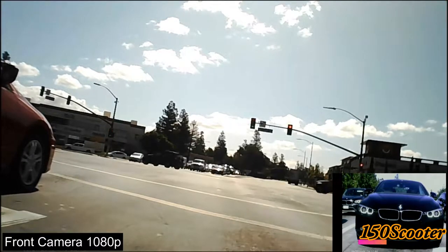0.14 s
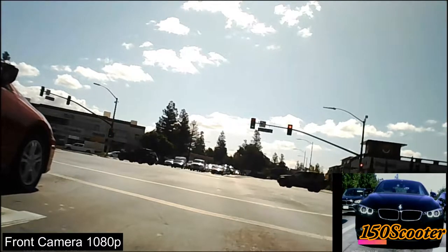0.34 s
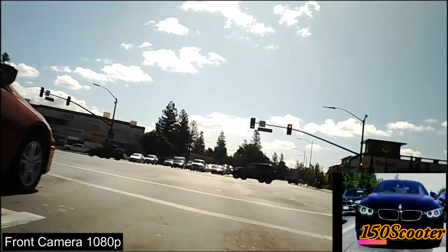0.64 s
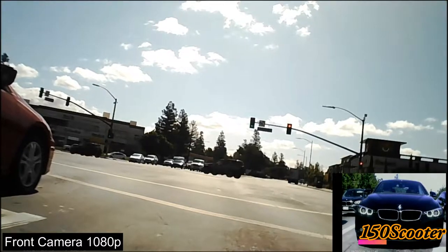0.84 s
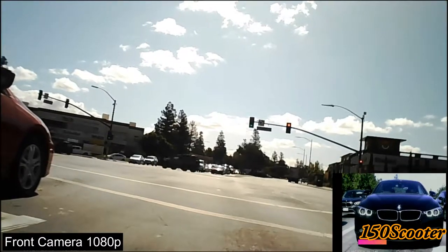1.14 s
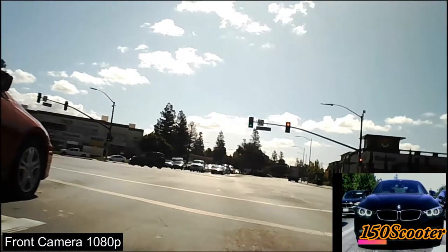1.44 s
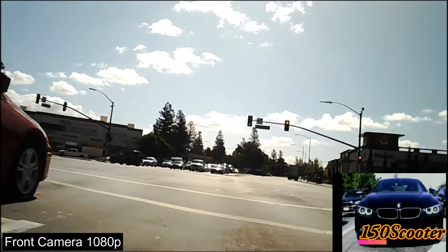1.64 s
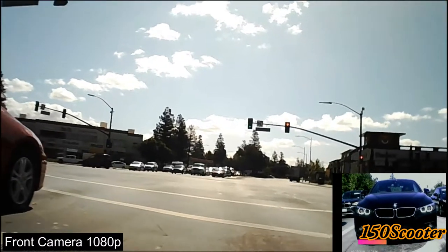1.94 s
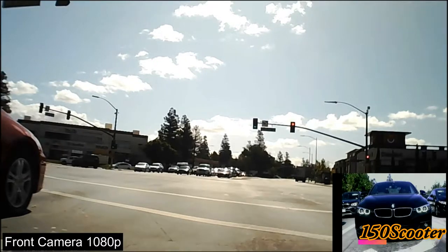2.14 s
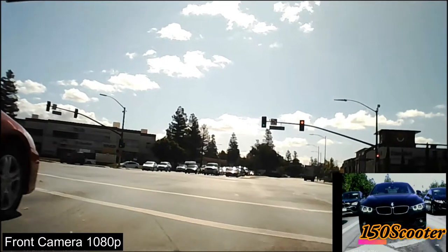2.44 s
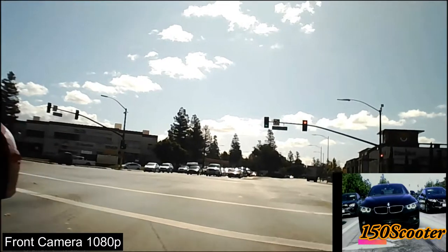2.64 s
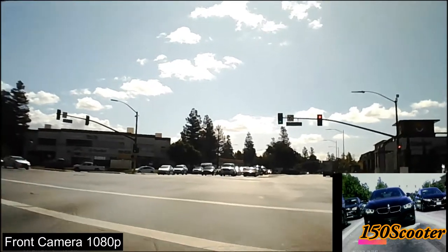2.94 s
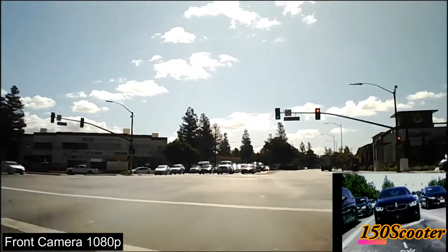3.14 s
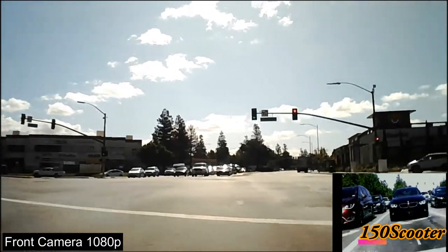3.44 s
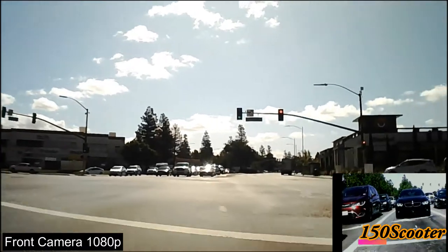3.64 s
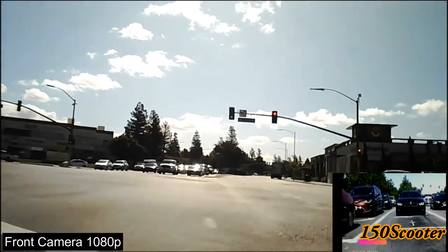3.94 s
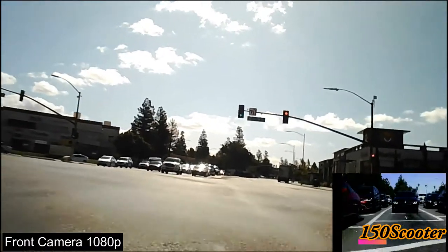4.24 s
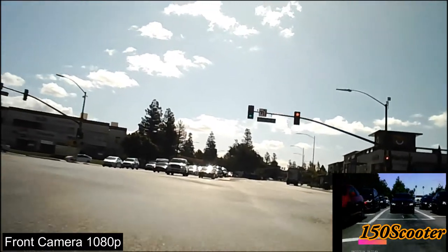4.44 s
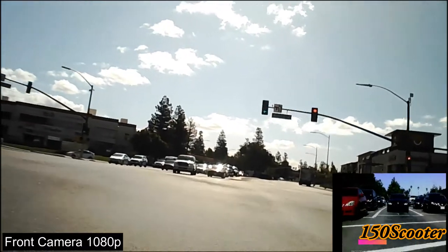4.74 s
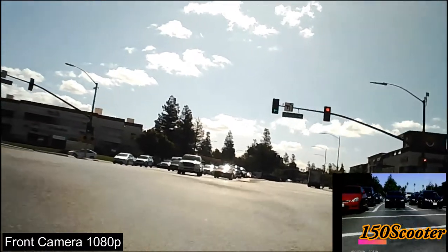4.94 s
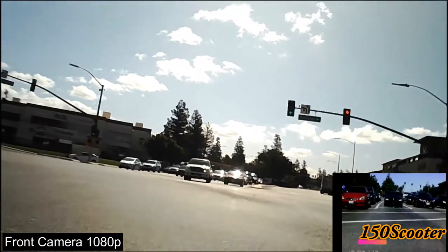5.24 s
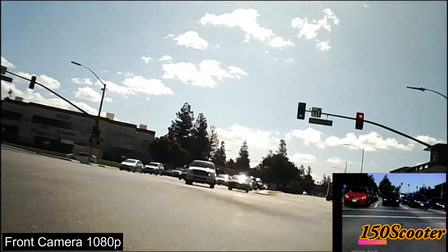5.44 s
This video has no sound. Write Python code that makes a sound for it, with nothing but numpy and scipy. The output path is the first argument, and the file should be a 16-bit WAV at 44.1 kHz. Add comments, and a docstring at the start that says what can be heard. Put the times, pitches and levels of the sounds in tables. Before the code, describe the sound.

Close body-mounted microphone on a small four-stroke scooter outdoors. First a quiet, slightly uneven putter with valve ticks; then the throttle opens and the sound swells within half a second to a rough, buzzing drone. Loose plastic rattles quickly, irregular hollow knocks strike the mount, and low rumble and whirr fill in underneath. Speed eases briefly, then rises again, cutting off while still riding.

```python
"""A single-cylinder four-stroke scooter engine idles, then pulls away, heard by a microphone bolted to its body.
Each firing is an impulse that rings the bodywork; under load, crank harmonics add a drone.
Panels chatter and valves tick as noise bursts timed by the cycle; fan, casing and road are shaped noise.
The crank shakes the microphone mount once a turn; near resonance it swings widely and slaps.
Single hard knocks strike the mount, the drive clacks at the start, and the microphone flattens the peaks."""
import sys
import numpy as np
from scipy import signal
from scipy.fft import rfft, irfft, next_fast_len
from scipy.io import wavfile
from scipy.ndimage import uniform_filter1d

SR = 44100
rng = np.random.default_rng(int(sys.argv[2]) if len(sys.argv) > 2 else 0)


def to_wav(s):
    """Save 16-bit WAV."""
    ch = np.atleast_2d(s).T  # columns
    pcm = np.round(np.clip(ch, -1, 1) * 32767)  # PCM
    wavfile.write(sys.argv[1], SR, pcm.astype(np.int16))


N = 246519
TIME_S = np.arange(N) / SR

# Levels in spectra, modes and blows are relative; each layer is scaled later.
# road rumble spectrum: (frequency [Hz], level [dB])
ROAD_SPECTRUM = [(15, -5.5), (35, -1.5), (70, 3.5), (130, -2.5), (200, 1), (280, 2), (420, -5), (520, -15),
                 (1200, -21.5), (2300, -31), (3000, -38.5), (4200, -45), (6000, -57.5), (15000, -70.5)]
# rougher and smoother road: (middle [s], length [s], level change [dB])
ROUGH_PATCHES = [(3.0, 0.17, 1.5), (3.58, 0.069, 5.5), (3.76, 0.1, -6.5), (4.35, 0.16, 0), (4.65, 0.25, 1),
                 (5.22, 0.51, -1.5)]
# fan and gear whirr spectrum: (frequency [Hz], level [dB])
FAN_SPECTRUM = [(20, 7), (60, 15), (130, 17.5), (300, 16.5), (400, -14.5), (540, -2.5), (780, 1),
                (1320, -0.5), (1470, -16), (1600, -2), (1720, -17), (1950, -10), (2450, -13.5),
                (2850, -34.5), (3500, -24), (4300, -25), (4900, -34), (5850, -37), (8500, -39),
                (15000, -43.5)]
# narrow casing resonances: (frequency [Hz], width [Hz], level [dB])
CASING_MODES = [(1616, 50, 0), (3460, 210, -13.5), (4335, 92, -15.5), (5740, 200, -22.5), (7060, 170, -28),
                (8000, 250, -40.5), (9260, 250, -33)]
# valve tick spectrum: (frequency [Hz], level [dB])
VALVE_SPECTRUM = [(900, 9.5), (1900, 12), (2400, 4.5), (2900, -8), (3600, 1), (4300, -7), (5000, -18.5),
                  (5850, -4.5), (6500, -14.5), (7200, -15.5), (8500, -30.5), (15000, -44)]
# drive clacks as the throttle opens: (time [s], level [dB])
DRIVE_CLACKS = [(2.121, -38.5), (2.186, -39)]
# loose-panel chatter spectrum: (frequency [Hz], level [dB])
PANEL_SPECTRUM = [(300, -32), (600, 13), (850, 2), (1120, 15), (1420, -8.5), (1650, 5), (2400, -13.5),
                  (2950, -31), (3600, -10), (4300, -17), (5000, -34.5), (7200, -42), (9000, -55.5),
                  (15000, -62)]
# loose panel striking the frame: (frequency [Hz], width [Hz], level [dB])
PANEL_MODES = [(1030, 180, -2), (1135, 98, -0.5), (1610, 220, -16)]
# harder panel rattle: (middle [s], length [s], level change [dB])
RATTLE_BOUTS = [(3.05, 0.6, 5.5), (3.95, 0.22, 4.5), (5.08, 0.13, 4)]
# struck mount resonances: (frequency [Hz], width [Hz], level [dB])
MOUNT_MODES = [(252, 93, 5.5), (407, 93, -16), (1043, 180, -10)]
# mount's plastic buzz spectrum: (frequency [Hz], level [dB])
BUZZ_SPECTRUM = [(500, 0), (1100, 5.5), (1500, -6), (2300, -9), (3000, -27.5), (4200, -10.5), (5200, -22),
                 (7200, -24.5), (9000, -31.5), (15000, -32.5)]
# single hard knocks on the mount: (time [s], level [dB])
MOUNT_KNOCKS = [(2.357, -9.5), (2.400, -6.5), (2.487, 2), (2.592, 3), (2.711, 3.5), (2.741, 4),
                (2.865, -8.5), (2.981, -5), (3.291, 1), (3.563, 5.5), (3.594, 3.5), (3.840, 3.5),
                (4.087, 1.5), (4.302, 0), (4.374, -3), (4.929, 3)]
# harder mount slaps: (middle [s], length [s], level change [dB])
SLAP_BOUTS = [(3.13, .2, 3.5), (4.68, .16, 4.5), (4.87, 0.34, 2)]
# bodywork response to engine harmonics: (frequency [Hz], level [dB])
DRONE_RESPONSE = [(33, -28), (42, -24), (70, -27), (98, -18), (130, -32), (162, -24), (198, -29),
                  (240, -20), (265, -20), (290, -23), (322, -22), (342, -32), (400, -33), (480, -43),
                  (600, -50)]
# bodywork resonances at idle: (frequency [Hz], width [Hz], level [dB])
IDLE_MODES = [(27, 11, 4.5), (54.9, 8.2, 4), (119.5, 26, -3.5), (225, 13, -4), (259, 17, -27)]
# bodywork resonances under load: (frequency [Hz], width [Hz], level [dB])
RIDE_MODES = [(36.5, 37, -10), (104, 110, -3.5), (162, 29, 6.5), (248, 19, 13.5), (309.6, 37, -14),
              (416, 27, -21)]
# engine speed, firing every second turn: (time [s], crank speed [turns/s])
CRANK_SPEED = [(0, 25.3), (.8, 25.46), (1.05, 27.0), (1.7, 24.1), (2.13, 27.8), (2.42, 50.3), (2.55, 67.6),
               (2.7, 70.86), (3.4, 66.14), (4.0, 64.33), (4.5, 66.72), (4.85, 74.83), (5.2, 80.17),
               (5.59, 80.8)]
# firing strength as the throttle opens and eases: (time [s], level [dB])
FIRING_STRENGTH = [(0, -21.5), (1.05, -19.5), (1.5, -21), (2.12, -20), (2.26, -15), (2.35, -2.5),
                   (2.45, -5.5), (2.65, 0.5), (3.3, -3), (3.8, -4.5), (4.25, -2.5), (4.6, -2), (5.0, 0),
                   (5.59, -2)]

# road: start and rise time, level under way, extra change at standstill
PULL_AWAY_S, GET_GOING_S, ROAD_DB, STANDING_DB = 2.038, 0.48, -18, -27.5
# casing: level with the crank at MOUNT_HZ, rise with speed
CASING_DB, CASING_DB_PER_OCTAVE = -46, 14.5
# panels: level under load, extra change at idle
PANEL_DB, IDLE_PANEL_DB = -35.5, -24
# mount: resonance, lag of its swing; crank shake at resonance, extra change at idle
MOUNT_HZ, MOUNT_WIDTH_HZ, MOUNT_LAG_S = 70.16, 10.02, 0.068
SHAKE_DB, IDLE_SHAKE_DB = -12.5, -0.5
# slaps: relative level at resonance, dB of slap per dB of swing, lag
SLAP_DB, SLAP_DB_PER_DB, SLAP_LAG_S = 3, 2.7, .12
# slap position [cycles] at resonance; earlier below and later above by up to the slip
SLAP_PLACE, SLAP_SLIP = .8, 0.1157
# microphone: clipping ceiling [full scale = 1], sharpness, treble corner, top cutoff
CEILING, KNEE, DULL_HZ, TOP_HZ = 0.45, 14.0, 7000, 15700


def undb(db):
    """Decibels to gain."""
    return 10 ** (np.asarray(db) / 20)


def unit(x):
    """Scale to rms 1."""
    return x / np.sqrt(np.mean(x ** 2))


def curve(table):
    """Join (time, value) points by straight lines."""
    time_s, value = np.transpose(table)
    return np.interp(TIME_S, time_s, value)


def late(control, lag_s):
    """Delay a control, holding its first value."""
    return np.interp(TIME_S - lag_s, TIME_S, control)


def swells(table):
    """Sum of bell-shaped level changes in dB, each `length` wide at 1/e."""
    return sum(db * np.exp(-(2 * (TIME_S - s) / length) ** 2) for s, length, db in table)


def timed(table):
    """Single impulses at listed times and levels."""
    blows = np.zeros(N)
    for time_s, db in table:
        blows[int(time_s * SR)] = undb(db)
    return blows


def strokes(cycle, at, scatter_db, slop):
    """One impulse per engine cycle at phase `at` [cycles], with random level and timing."""
    count = int(cycle[-1]) + 1
    chance = rng.standard_normal((count, 2))
    phase = np.arange(count) + at + slop * chance[:, 0]
    where = np.interp(phase, cycle, np.arange(N)).astype(int)
    blows = np.zeros(N)
    blows[where] = undb(scatter_db * chance[:, 1])
    blows[-1] = 0  # discard strokes past the end
    return blows


def fade(blows, decay_s, rise_s=0.0022):
    """Envelope with a short rise and exponential decay at each blow."""
    tail = signal.lfilter([1], [1, -np.exp(-1 / (decay_s * SR))], blows)
    return uniform_filter1d(tail, size=max(int(rise_s * SR), 1))


def colour(x, spectrum):
    """Filter by a spectrum interpolated over log frequency; rms 1."""
    hz, db = np.transpose(spectrum)
    size = next_fast_len(N + SR)
    bin_hz = np.maximum(np.fft.rfftfreq(size, 1 / SR), 1)
    gain = undb(np.interp(np.log(bin_hz), np.log(hz), db))
    return unit(irfft(rfft(x, size) * gain, size)[:N])


def noise(spectrum, envelope=1):
    """White noise shaped by an envelope, then coloured; rms 1."""
    return colour(envelope * rng.standard_normal(N), spectrum)


def ring(x, hz, width_hz):
    """One resonance, gain 1 at its centre."""
    return signal.lfilter(*signal.iirpeak(hz, hz / width_hz, fs=SR), x)


def bodywork(blows, modes, soft_hz):
    """Blows ring parallel resonances; a low-pass softens them; rms 1."""
    rung = sum(undb(db) * ring(blows, hz, width_hz) for hz, width_hz, db in modes)
    return unit(signal.sosfilt(signal.butter(4, soft_hz, fs=SR, output="sos"), rung))


def swing_db(crank_hz):
    """Mount swing relative to its peak: a resonance driven at crank speed."""
    detune = (crank_hz ** 2 - MOUNT_HZ ** 2) / (crank_hz * MOUNT_WIDTH_HZ)
    return -10 * np.log10(1 + detune ** 2)


def road():
    """Noise rumble that rises on pulling away and varies with road roughness."""
    standing = 1 - np.clip((TIME_S - PULL_AWAY_S) / GET_GOING_S, 0, 1)
    level_db = ROAD_DB + STANDING_DB * standing + swells(ROUGH_PATCHES)
    return undb(level_db) * noise(ROAD_SPECTRUM)


def fan(cycle, firing_db, swell_db=1.15, at=0.46):
    """Fan and gear noise, swelling as each firing speeds the crank up."""
    swell = undb(swell_db * np.cos(2 * np.pi * (cycle - at)))
    # rises less than the firings
    return undb(-23.5 + 0.53 * firing_db) * noise(FAN_SPECTRUM, swell)


def casing(crank_hz):
    """Noise from gears and bearings rings the metal casing, louder with speed."""
    rub = rng.standard_normal(N)
    rung = 0
    for hz, width_hz, db in CASING_MODES:
        rung = rung + undb(db) * ring(ring(rub, hz, width_hz), hz, 4 * width_hz)
    level_db = CASING_DB + CASING_DB_PER_OCTAVE * np.log2(crank_hz / MOUNT_HZ)
    return undb(level_db) * unit(rung)


def valves(cycle, firing_db):
    """Two noise ticks per cycle, the second stronger."""
    first = strokes(cycle, at=.37, scatter_db=1.5, slop=.01)
    second = strokes(cycle, at=.64, scatter_db=1.0, slop=.008)
    envelope = fade(undb(-9) * first + second, decay_s=.009, rise_s=.004)
    # rises less than the firings
    return undb(-41.5 + 0.47 * firing_db) * noise(VALVE_SPECTRUM, envelope)


def clacks():
    """Short, dull band-passed noise bursts as the drive takes up its slack."""
    burst = fade(timed(DRIVE_CLACKS), decay_s=0.015) * rng.standard_normal(N)
    return undb(15.5) * ring(ring(burst, 2050, 600), 1900, 1200)


def panels(cycle, load):
    """Loose panels chatter after each firing; under load they also strike the frame."""
    blows = strokes(cycle, at=.415, scatter_db=1.1, slop=.008)
    clack = bodywork(blows, PANEL_MODES, soft_hz=1960)
    chatter = noise(PANEL_SPECTRUM, fade(blows, decay_s=0.0057))
    level_db = PANEL_DB + IDLE_PANEL_DB * (1 - load) + swells(RATTLE_BOUTS)
    return undb(level_db) * (undb(-5) * load * clack + chatter)


def knock(blows):
    """A blow to the mount: hollow resonances plus a short plastic buzz."""
    hollow = bodywork(blows, MOUNT_MODES, soft_hz=1650)
    burst = fade(blows, decay_s=.0025, rise_s=.003)
    return hollow + undb(-13.0) * noise(BUZZ_SPECTRUM, burst)


def mount_slaps(cycle, crank_hz, load):
    """Loose play slaps once a cycle, harder with wider swing; listed single knocks are added."""
    felt_hz = late(crank_hz, SLAP_LAG_S)
    place = SLAP_PLACE + SLAP_SLIP * np.tanh(np.pi * (felt_hz - MOUNT_HZ) / MOUNT_WIDTH_HZ)
    slap_db = SLAP_DB + SLAP_DB_PER_DB * swing_db(felt_hz) + swells(SLAP_BOUTS)
    slaps = strokes(cycle - place + 1, at=0, scatter_db=1.0, slop=.007)
    return undb(-24.5) * knock(load * undb(slap_db) * slaps + timed(MOUNT_KNOCKS))


def crank_shake(cycle, crank_hz, load):
    """The piston's imbalance rocks the mount as a sine once per crank turn."""
    level_db = SHAKE_DB + IDLE_SHAKE_DB * (1 - load) + swing_db(late(crank_hz, MOUNT_LAG_S))
    return np.sqrt(2) * np.cos(4 * np.pi * (cycle - .33)) * undb(level_db)


def drone(cycle, crank_hz, odd_db=-5, at=0.3726, lag_rad=0.1205):
    """Harmonics of the engine cycle radiated by the bodywork; crank-turn multiples get more gain."""
    out = 0
    for k in range(1, 15):
        db = np.interp(k * crank_hz / 2, *np.transpose(DRONE_RESPONSE)) + odd_db * (k % 2)
        # higher harmonics arrive later through the frame
        phase_rad = 2 * np.pi * k * (cycle - at) - lag_rad * k ** 2
        out = out + undb(db) * np.sqrt(2) * np.cos(phase_rad)
    return out


def thumps(cycle, load, recoil_s=0.00412):
    """Firings ring the bodywork: separate thuds at idle, a merged throb under load."""
    firing = strokes(cycle, at=.35, scatter_db=1.5, slop=.005)
    # kick and recoil on the rubber mounts
    kick = undb(-8) * firing - np.roll(firing, int(recoil_s * SR))
    # compression tugs the frame before; the exhaust puff follows
    compression = -undb(-4) * strokes(cycle, at=0.1684, scatter_db=-2.0, slop=0.01)
    exhaust = undb(-21) * strokes(cycle, at=0.49, scatter_db=1.5, slop=0.012)
    idle = bodywork(compression + kick + exhaust, IDLE_MODES, soft_hz=291)
    ride_firing = strokes(cycle, at=0.349, scatter_db=-4.0, slop=0.014)
    ride = bodywork(ride_firing, RIDE_MODES, soft_hz=417)
    return (1 - load) * undb(-10) * idle + load * undb(-32) * ride


def scene():
    """Sum road, machinery, mount and engine, driven by shared crank and firing curves."""
    crank_hz = curve(CRANK_SPEED)
    firing_db = curve(FIRING_STRENGTH)
    cycle = np.cumsum(crank_hz) / SR / 2  # two turns per cycle
    load = np.clip((crank_hz - 30) / 30, 0, 1)  # inferred from crank speed
    background = road() + fan(cycle, firing_db) + casing(crank_hz)
    rattles = valves(cycle, firing_db) + clacks() + panels(cycle, load)
    mount = mount_slaps(cycle, crank_hz, load) + crank_shake(cycle, crank_hz, load)
    engine = undb(firing_db) * (load * drone(cycle, crank_hz) + thumps(cycle, load))
    return (background + rattles + mount + engine)[None]


def record(dry):
    """The microphone flattens peaks, its port dulls treble, and a steep filter cuts the top."""
    clipped = dry / (1 + np.abs(dry / CEILING) ** KNEE) ** (1 / KNEE)
    dull = signal.lfilter(*signal.butter(1, DULL_HZ, fs=SR), clipped)
    closing = np.clip((TIME_S[-1] - TIME_S) / .004, 0, 1)  # 4 ms fade-out
    top_cut = signal.ellip(8, .2, 70, TOP_HZ, fs=SR, output="sos")
    return signal.sosfilt(top_cut, dull * closing)


dry = scene()
out = record(dry)
to_wav(out)
```